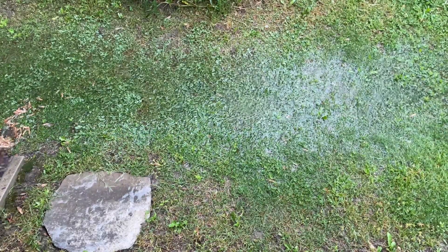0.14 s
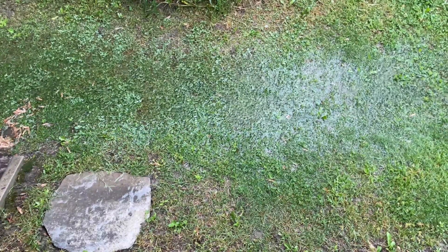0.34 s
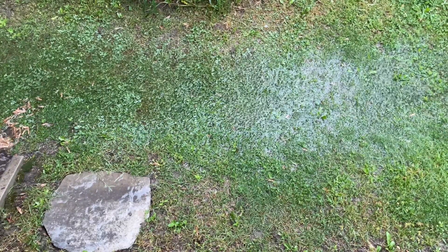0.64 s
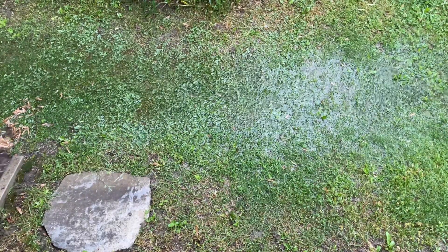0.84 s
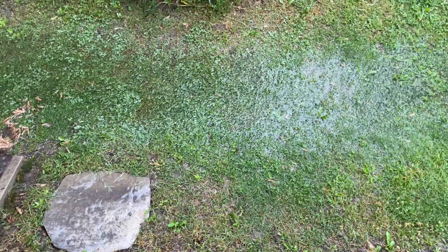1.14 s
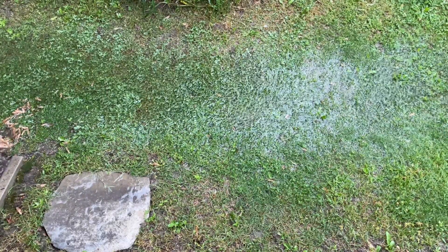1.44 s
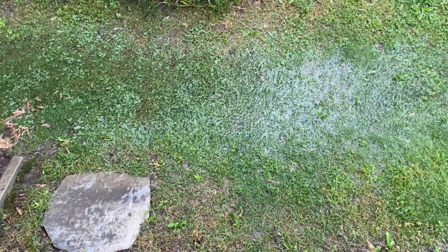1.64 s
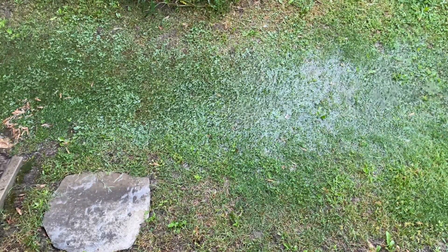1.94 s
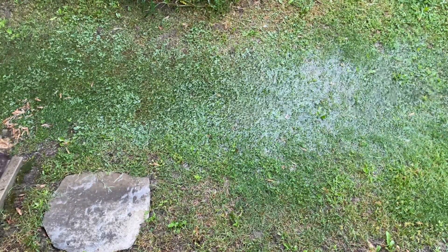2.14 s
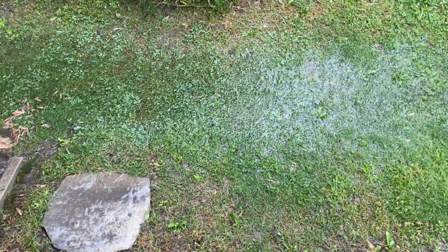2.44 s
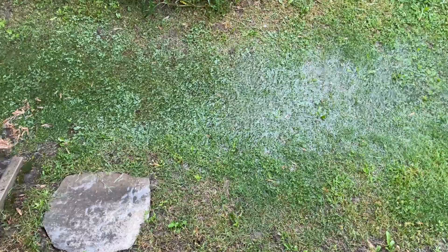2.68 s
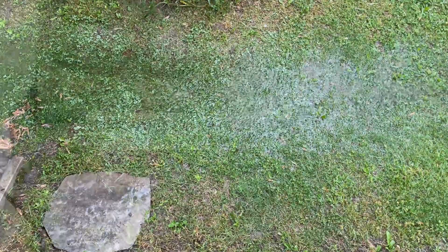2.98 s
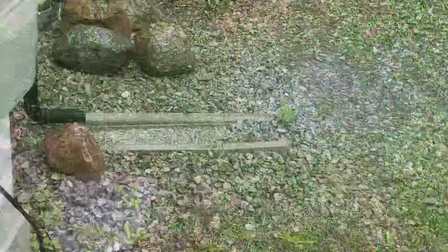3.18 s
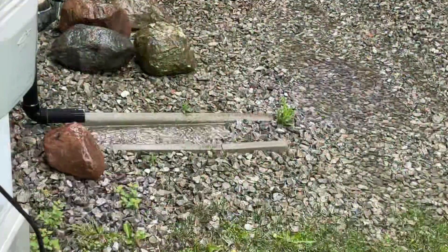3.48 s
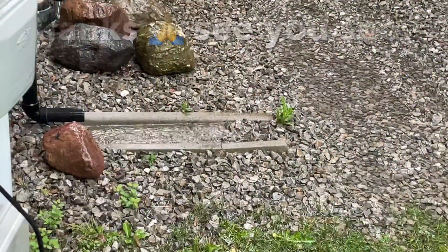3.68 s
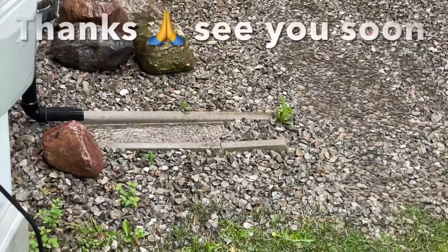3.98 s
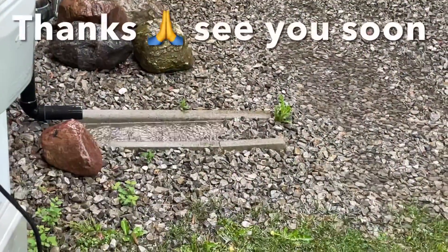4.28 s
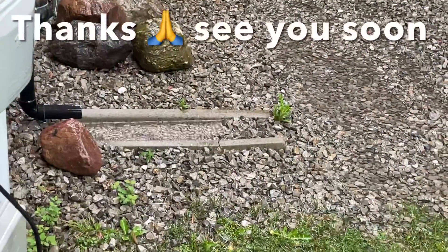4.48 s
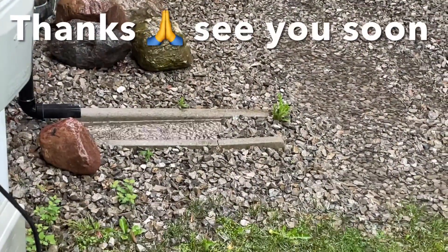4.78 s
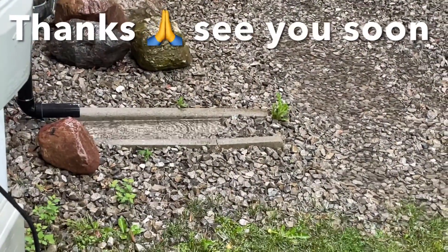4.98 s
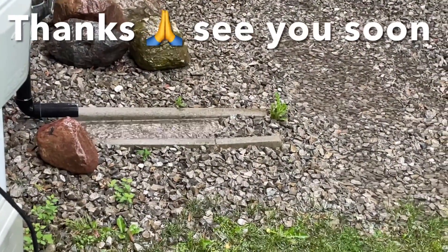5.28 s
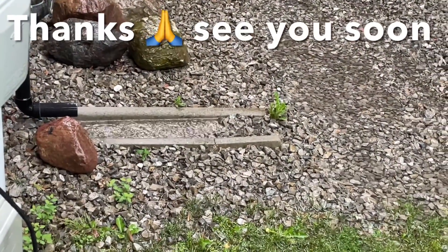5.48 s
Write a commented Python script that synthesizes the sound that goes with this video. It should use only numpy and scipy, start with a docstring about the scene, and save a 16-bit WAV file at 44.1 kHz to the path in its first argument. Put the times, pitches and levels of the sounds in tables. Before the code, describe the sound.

Rain hisses on grass, then crackles on stones with burbling runoff, as a small bird chirps repeatedly and a single loud pop strikes late.

```python
"""Rain from lawn to gravel, with a sparrow

Rain, as noise shaped by random splashes, falls on a lawn, then more crisply on gravel by a house.
A two-voiced sparrow chirps about once a second, with reflections; light air rumbles on the microphone
and far tyres hiss. Near drops tick and ring, a downspout burbles, and a broad band of noise
swells and fades like a car on a wet road. One fat drop knocks on the microphone as a falling pop."""
import sys
import numpy as np
from scipy import signal
from scipy.fft import rfft, irfft
from scipy.io import wavfile
from scipy.ndimage import uniform_filter1d

SR = 44100
rng = np.random.default_rng(int(sys.argv[2]) if len(sys.argv) > 2 else 0)


def master_out(mix):
    """Clip the mix to full scale and print it as 16-bit PCM to the path in sys.argv[1]."""
    frames = np.transpose(np.atleast_2d(mix))
    ceiling = np.clip(frames, -1, 1)
    pcm = np.round(ceiling * 32767).astype(np.int16)
    wavfile.write(sys.argv[1], SR, pcm)


N = 247878
T = np.arange(N) / SR
PORT_LAG_S = 0.000186  # sound from the left reaches the right port this much later


def undb(db):
    """Logarithmic level: decibels to amplitude gain."""
    return 10 ** (np.asarray(db) / 20)


def unit(x):
    """Normalization: scale to rms 1."""
    return x / np.sqrt(np.mean(x ** 2) + 1e-20)


def colour(x, points):
    """Spectral shaping: weight each frequency by (Hz, dB) points joined on a logarithmic axis."""
    hz, db = np.transpose(points)
    log_f = np.log(np.arange(N // 2 + 1) * SR / N + 1)
    gain = undb(np.interp(log_f, np.log(hz), db, left=-90, right=-90))
    return irfft(rfft(x) * gain, N)


def band(x, lo_hz, hi_hz):
    """Band-pass filtering with gentle slopes."""
    edges_hz = [lo_hz, min(hi_hz, SR / 2 - 100)]
    return signal.sosfilt(signal.butter(2, edges_hz, "band", fs=SR, output="sos"), x)


def walk(rate):
    """Random modulation: held random values, about `rate` a second, smoothed to a wander of rms 1."""
    hold = max(int(SR / rate), 1)
    steps = rng.standard_normal(N)[np.arange(N) // hold]
    return unit(uniform_filter1d(steps, hold))


def bell(t, centre, half, order=2):
    """Smooth envelope: a hump of height 1; a higher order flattens its top."""
    return np.exp(-np.abs((t - centre) / half) ** order)


def step(t, width):
    """Smooth switching: a rise from 0 to 1 around t = 0."""
    return (1 + np.tanh(t / width / 2)) / 2


def stereo(mid, side):
    """Sum and difference: left and right from their common and differing parts."""
    return np.array([mid + side, mid - side])


def patter(rate, spread_db, share, flicker_db):
    """Shot noise: far drops merge into hiss; nearer ones tick, with each octave flickering on its own."""
    chance, size = rng.random((N, 2)).T
    hits = (chance < rate / SR) * undb(spread_db * np.minimum(-np.log(size + 1e-9), 4))
    hits = signal.lfilter([1], [1, -np.exp(-1 / (0.0084 * SR))], hits)  # a splash lasts a few milliseconds
    share = np.clip(share, 0, 1)
    f = np.arange(N // 2 + 1) * SR / N
    edges_hz = [0, 700, 1400, 2800, 5600, 11200, SR]
    total = 0
    for lo, hi in zip(edges_hz, edges_hz[1:]):
        noise = rng.standard_normal((2, N))
        power = 1 - share + share * unit(hits * undb(4.1 * walk(400))) ** 2
        octave = irfft(rfft(noise * np.sqrt(power)) * ((f >= lo) & (f < hi)), N)
        total = total + octave * undb(flicker_db * walk(22.13))
    return total


def rain(drops, mid_colour, side_colour, side_db):
    """Spectral shaping: the drops are shaped by one spectrum for the middle and one for the sides."""
    mid = unit(colour(drops[0], mid_colour))
    side = undb(side_db) * unit(colour(drops[1], side_colour))
    return stereo(mid, side)


# The low patter on the lawn lies to the right, its hiss to the left.
# Each row: frequency in Hz, lean as a plain number from -1 (right) to 1 (left).
LAWN_LEAN = [(1200, -0.55), (2000, -.15), (4500, -.15), (6000, .65)]


def slant(drops):
    """Interaural delay: rain that falls more to one side reaches the nearer port first."""
    f = np.arange(N // 2 + 1) * SR / N
    lean = np.clip(np.interp(f, *np.transpose(LAWN_LEAN)), -1, 1) * np.sin(2 * np.pi * f * PORT_LAG_S)
    tied = 1j * lean * rfft(drops[0])  # locked in phase to the common part
    free = np.sqrt(1 - lean ** 2) * rfft(drops[1])
    return np.array([drops[0], irfft(tied + free, N)])


# Spectra of rain on the lawn: the part common to both ears, then the part that differs.
# Each row: frequency in Hz, relative level in dB per Hz.
LAWN_COMMON = [(100, -27), (250, -1), (380, -10), (520, -6), (720, -10.5), (900, -8), (1400, -12),
               (2700, -9), (4300, -13), (5600, -13), (6900, -22), (7800, -55.5), (9000, -19), (12500, -24),
               (14500, -56)]
LAWN_DIFFERING = [(88, -35), (150, -42), (230, -17), (542, -2), (598, 0.5), (1580, -8.5), (3010, -1.5),
                  (5290, -12.5), (6690, -8.5), (9130, -12.5), (10300, -22), (10900, -59), (11500, -41),
                  (12200, -21.5), (15800, -14)]
LAWN_DB, LAWN_EASE_DB_PER_S = -42.5, 0.62


def lawn_rain(on_gravel):
    """Dense shot noise: soft patter that eases slowly and yields to the gravel at constant power."""
    drops = slant(patter(rate=710, spread_db=7.5, share=0.14, flicker_db=1.5))
    lawn = rain(drops, LAWN_COMMON, LAWN_DIFFERING, side_db=-1.0)
    return lawn * undb(LAWN_DB - LAWN_EASE_DB_PER_S * T) * np.sqrt(1 - on_gravel)


# Spectrum of the air. Each row: frequency in Hz, relative level in dB per Hz.
AIR_SPECTRUM = [(20, -38), (40, -2.5), (65, 3), (100, 0), (150, -5.5), (250, -16), (500, -21.5)]
# Lulls of the air. Each row: centre in seconds, half length in seconds, change in dB.
AIR_LULLS = [(0.362, 0.034, -10), (4.487, 0.067, -19), (5.093, 0.35, -7.5)]
# Soft low thuds of air on the microphone.
# Each row: start in seconds, level in dB, mean pitch in Hz (it wavers), time to the peak in seconds.
AIR_BUMPS = [(.428, -30, 58.6, 0.017), (0.719, -32.5, 103, 0.0087), (.841, -27.5, 87, 0.0063),
             (.872, -35.5, 99, 0.016), (1.13, -41, 56.5, 0.02), (1.465, -31.5, 73, 0.019),
             (1.494, -38, 80, 0.011), (1.687, -32, 74, 0.0052), (2.81, -34, 85, 0.0043),
             (3.279, -29, 68, 0.0091), (4.384, -28, 59.6, 0.0069), (4.667, -36.5, 86, 0.0072),
             (4.74, -40, 58.4, .02), (5.385, -38.5, 52.3, 0.016), (5.465, -37, 63, 0.011),
             (5.547, -33, 69, 0.0059)]
AIR_DB, AIR_EASE_DB_PER_S, AIR_WANDER_DB = -44.5, 0.8, -0.6


def air():
    """Turbulent pressure: low rumble, nearly alike in both ears, with lulls and short bumps."""
    noise = unit(colour(rng.standard_normal((2, N)), AIR_SPECTRUM))
    level_db = AIR_DB - AIR_EASE_DB_PER_S * T + AIR_WANDER_DB * walk(6.5)
    level_db = level_db + sum(db * bell(T, s, half) for s, half, db in AIR_LULLS)
    out = stereo(noise[0] * undb(level_db), noise[1] * undb(-55.5))
    for s, db, hz, rise_s in AIR_BUMPS:
        age = np.maximum(T - s, 0) / rise_s
        wavering_hz = hz * np.exp(0.19 * walk(120)) * (T > s)
        eddy = np.sin(2 * np.pi * np.cumsum(wavering_hz) / SR)
        out = out + undb(db) * eddy * age * np.exp(1 - age)
    return out


def traffic():
    """Filtered noise: far tyres give a narrow, wavering hiss over a low rumble, both fading."""
    hiss = unit(band(rng.standard_normal((2, N)), 836, 1130))
    rumble = undb(-7) * unit(band(rng.standard_normal(N), 160, 288))
    fade_db_per_s = 7
    return (hiss + rumble) * undb(-50 - fade_db_per_s * T + 0.33 * walk(7.6))


# One gesture of the lower voice, shared by all chirps: thin lead-in, held note, drop and sag, two arches.
# Each row: time in seconds from the start of the held note, pitch in Hz, level in dB,
# all before each call's own factors.
LOWER_GESTURE = [(-.05, 3150, -29), (-.01, 3520, -21), (-.003, 3900, -7), (.001, 5080, -2),
                 (.007, 5160, -9), (.015, 5165, 0), (.026, 5150, 0), (.029, 4100, -4), (.042, 3980, -7),
                 (.056, 3700, -13), (.073, 3580, -5), (.082, 4700, -4), (.092, 3700, -8), (.112, 2950, -21),
                 (.132, 3400, -20), (.138, 3850, -6), (.146, 4350, -10), (.158, 3050, -15),
                 (.169, 3100, -22)]
EDGE_S = 0.0011


def lower_voice(t):
    """Frequency modulation: pitch and gain climb, hold one note, drop, then make two quick arches."""
    s, hz, db = np.transpose(LOWER_GESTURE)
    gain = undb(np.interp(t, s, db)) * step(t - s[0], EDGE_S) * step(s[-1] - t, EDGE_S)
    return np.interp(t, s, hz), gain


# Pulses of the upper voice. Each row: centre in seconds from the start of the held note,
# half length in seconds, level in dB, all before each call's own factors.
UPPER_GESTURE = [(-.024, 0.019, -14.5), (.013, 0.012, -10.5), (0.056, 0.016, -11), (0.06, .005, -19),
                 (0.096, 0.0087, -20), (0.125, 0.023, -14.5)]
# pitch at the start of the held note, slope, highest and lowest pitch, before each call's pitch factor
UPPER_HZ, UPPER_SAG_HZ_PER_S, UPPER_TOP_HZ, UPPER_END_HZ = 5925, 14000, 6450, 4300


def upper_voice(t):
    """Second source: the other side of the syrinx glides straight down, sung in separate pulses."""
    gain = sum(undb(db) * bell(t, s, half) for s, half, db in UPPER_GESTURE)
    return np.clip(UPPER_HZ - UPPER_SAG_HZ_PER_S * t, UPPER_END_HZ, UPPER_TOP_HZ), gain


HELD_S, SETTLE_S = 0.0266, 0.0091  # after the held note each call settles on its own pitch


def whistle(voice, t, pitch, rough, trill, trill_hz, flutter_db):
    """Phase accumulation: a near sine follows a pitch contour with a fast trill and uneven pitch and level."""
    hz, gain = voice(t)
    waver, flutter, drift = (walk(rate)[:len(t)] for rate in (1400, 350, 60))
    # the held note is nearly pure; after it the buzz is full
    held = bell(t, .016, 0.013, order=4)
    after = np.clip((t - HELD_S) / SETTLE_S, 0, 1)
    buzz = (rough * waver + trill * np.sin(2 * np.pi * trill_hz * t + drift)) * (1 + after) / 2
    hz = hz * pitch ** after * (1 + buzz * (1 - 1.2 * held))
    return np.sin(2 * np.pi * np.cumsum(hz) / SR) * gain * undb(flutter_db * flutter * (0.5 - held / 2))


# The chirps. Each row: start of the held note in seconds, level in dB, pitch factor after the held note,
# length factor, accent of the held note in dB, upper voice in dB, sideways share in dB,
# lead-in change in dB, last arch change in dB.
CALLS = [ (-.033, -23, 1.013, 0.97, 7, -2.5, 4.5, 0, 0), (.634, -25, 1.007, 0.94, -1, -1.5, 7, 0, -3.5),
         (1.316, -24, 1.02, 0.93, -9, -2, 6.5, 0.5, -1), (2.448, -23.5, 1.02, 1, 2, -5, 3.5, -2, 2.5),
         (3.445, -19, .93, .91, -7.5, 0, -57, -6, -1), (4.442, -26, .96, .92, -18, 0, -28, -6, 0.5)]
# faint echo of the third chirp's held note
LATE_ECHO_S, LATE_ECHO_HALF_S, LATE_ECHO_HZ, LATE_ECHO_DB = 1.473, 0.013, 5360, -37.5
ECHO_S, ECHO_DB = .143, -26  # the chirps come back faintly from a far wall


def sparrow():
    """Two-source phonation: lead-in, held note and two lower arches; returns the sound and its sideways share."""
    out = np.zeros((2, N))
    for s, db, pitch, length, accent_db, upper_db, width_db, lead_db, end_db in CALLS:
        near = abs(T - s) < 1 / 4
        t = (T[near] - s) / length
        lower = whistle(lower_voice, t, pitch, rough=.015, trill=.03, trill_hz=280, flutter_db=3.5)
        upper = whistle(upper_voice, t, pitch, rough=.035, trill=.07, trill_hz=260, flutter_db=3.5)
        effort_db = accent_db * bell(t, 0.02, 0.017)
        effort_db = effort_db + lead_db * step(-t - .007, 0.0029) + end_db * step(t - .11, 0.011)
        out[:, near] += undb([[0], [width_db]]) * undb(db + effort_db) * (lower + undb(upper_db) * upper)
    late_echo = np.sin(2 * np.pi * np.cumsum(LATE_ECHO_HZ * (1 + 0.051 * walk(1400))) / SR)
    out[0] += undb(LATE_ECHO_DB) * late_echo * bell(T, LATE_ECHO_S, LATE_ECHO_HALF_S)
    echo = np.array([np.interp(T - ECHO_S, T, part, left=0) for part in out])
    return out + undb(ECHO_DB) * echo


# Nearby walls repeat each twist of the chirp. Each row: delay in seconds, level in dB.
WALL_REFLECTIONS = [(.0066, -14), (.0175, -10), (.031, -16)]
FAR_DB, FAR_T60_S = -20, .7  # slow scatter from the far side, relative to the near scatter at its start


def yard(x, sideways, t60, wet_db, side_db, wall_s, wall_db):
    """Convolution reverberation: direct sound, distinct reflections, and scatter from walls and shrubs."""
    t = T[:SR // 2]
    sideways = (sideways - np.interp(T - PORT_LAG_S, T, sideways)) / 2  # what differs between the two ports
    decay = undb(-60 * t / t60) + undb(FAR_DB - 60 * t / FAR_T60_S)
    tail = rng.standard_normal((2, len(t))) * decay * (t > .002)
    tail *= undb([[wet_db], [side_db]]) / np.sqrt(np.sum(tail ** 2, axis=1, keepdims=True))
    for s, db in WALL_REFLECTIONS:
        tail[:, int(s * SR)] += undb(db)
    wet = signal.fftconvolve(np.array([x, sideways]), tail, axes=1)[:, :N]
    wall = np.append(np.zeros(int(wall_s * SR)), sideways)[:N]
    return stereo(x + wet[0], undb(wall_db) * wall + wet[1])


# Near drops. Each row: start in seconds, level in dB before the attack, ring in Hz,
# top of the spray in Hz, decay of the spray in seconds.
NEAR_DROPS = [(1.8855, -31.5, 2490, 5750, 0.0088), (3.049, -35, 5200, 5500, .002),
              (3.116, -37, 2540, 3970, .002), (3.1837, -29.5, 2180, 6000, 0.0048),
              (3.5966, -29, 3800, 7950, 0.0043), (3.781, -31.5, 2980, 9000, 0.0025),
              (3.888, -41, 4300, 12000, .003), (3.958, -30, 2130, 12000, 0.0053),
              (4.0737, -24.5, 2320, 5000, .003), (4.353, -23, 2180, 6150, 0.0066),
              (4.5617, -50, 3570, 7200, 0.0027), (4.72, -30, 2900, 7900, 0.0026),
              (4.817, -27, 3580, 5460, 0.0027), (4.949, -25.5, 3670, 5500, 0.0045),
              (4.976, -51, 6500, 14000, 0.0031), (5.052, -37, 3930, 6000, 0.0027),
              (5.1305, -33, 4770, 6500, .005), (5.252, -31, 3400, 6000, .003),
              (5.341, -27.5, 4520, 6000, .004), (5.414, -31, 4100, 7000, .003),
              (5.39, -41, 2520, 14000, 0.002), (5.463, -52, 5240, 14000, 0.0026),
              (5.503, -35, 6030, 14000, 0.0024), (5.517, -34, 2390, 13000, 0.0015)]
DROP_ATTACK_S = .0006


def near_drops(ring_db, ring_s):
    """Impact and resonance: each near drop is a tick of spray and a brief wet ring."""
    out = np.zeros((2, N))
    t = T[:SR // 30]
    for s, db, hz, top_hz, decay_s in NEAR_DROPS:
        spray = band(band(rng.standard_normal((2, len(t))), 1500, top_hz), 1500, top_hz)
        ring = undb(ring_db) * np.sin(2 * np.pi * hz * t) * np.exp(-t / ring_s)
        drop = stereo(spray[0], spray[1] / 2) * np.exp(-t / decay_s) + ring
        drop = drop * (1 - np.exp(-t / DROP_ATTACK_S))
        i = int(s * SR)
        out[:, i:i + len(t)] += undb(db) * drop[:, :N - i]
    return out


# Spectrum of the rush. Each row: frequency in Hz, relative level in dB per Hz.
RUSH_SPECTRUM = [(100, -25), (250, -12.5), (500, -0.5), (900, 1), (1600, -0.5), (2500, -5.5), (4000, -16),
                 (6000, -99)]
RUSH_PEAK_S, RUSH_DB, RUSH_ATTACK_S, RUSH_RELEASE_S = 4.225, -33.5, 1, 1.67
RUSH_ECHO_S, RUSH_ECHO_DB = 0.003165, -24


def rush():
    """Comb filtering: a reflection makes a wide, soft roar slightly hollow as it swells and dies away."""
    noise = colour(rng.standard_normal((2, N)), RUSH_SPECTRUM)
    noise = unit(noise + undb(RUSH_ECHO_DB) * np.roll(noise, int(RUSH_ECHO_S * SR), axis=1))
    t = T - RUSH_PEAK_S
    swell = np.clip(1 + t / RUSH_ATTACK_S, 0, 1) ** 2 * np.clip(1 - t / RUSH_RELEASE_S, 0, 1)
    return stereo(noise[0], undb(-.5) * noise[1]) * undb(RUSH_DB) * swell


def plinks(count, lo_hz, hi_hz, cycles, glide, spread_db):
    """Bubble resonance: small bubbles at random moments ring for some cycles and rise in pitch; rms 1."""
    out = np.zeros(N)
    for when, pitch, size in rng.random((count, 3)):
        hz = lo_hz * (hi_hz / lo_hz) ** pitch
        i = int(when * N)
        age = np.arange(min(int(4 * cycles * SR / hz), N - i)) * hz / SR / cycles  # in decay times
        ring = np.sin(2 * np.pi * cycles * age * (1 + glide * age)) * np.exp(-age)
        out[i:i + len(age)] += ring * undb(spread_db * min(-np.log(size + 1e-9), 3))
    return unit(out)


# Spectra of rain on gravel: the part common to both ears, then the part that differs.
# Each row: frequency in Hz, relative level in dB per Hz.
GRAVEL_COMMON = [(150, 2), (400, -0.5), (1500, 2.5), (4000, 3.5), (6300, 1.5), (7500, -4.5), (8200, -81),
                 (9000, -9), (10800, -5), (13000, -10), (14500, -22)]
GRAVEL_DIFFERING = [(150, -3), (600, 10), (2000, 9), (4800, -84), (7000, 15), (8300, 11), (9800, 9.5),
                    (11500, -12.5), (13500, 3), (15000, 10), (15900, -2)]
GRAVEL_DB = -41


def gravel_rain(on_gravel):
    """Shot noise with resonances: a crisp crackle with ringing plinks, brought in at constant power."""
    crackle = patter(rate=1100, spread_db=3.2, share=.45, flicker_db=1.2)
    gravel = rain(crackle, GRAVEL_COMMON, GRAVEL_DIFFERING, side_db=-7.0)
    ringing = plinks(count=1200, lo_hz=2000, hi_hz=6200, cycles=11, glide=.006, spread_db=4.5)
    return (gravel + undb(-10.5) * ringing) * undb(GRAVEL_DB) * np.sqrt(on_gravel)


# Gushes from the downspout. Each row: start in seconds, level in dB.
SPOUT_GUSHES = [(3.35, -43), (3.586, -75)]
RUNOFF_DB, RUNOFF_LASTS_S, GUSH_ATTACK_S, GUSH_DECAY_S = -52.5, 1.4, 0.015, 0.07


def runoff():
    """Bubble and pipe resonance: water burbles from the downspout onto its splash block, and dwindles."""
    start = SPOUT_GUSHES[0][0]
    flow = undb(RUNOFF_DB) * step(T - start, GUSH_ATTACK_S) * bell(T, start, RUNOFF_LASTS_S)
    for s, db in SPOUT_GUSHES:
        flow = flow + undb(db) * step(T - s, GUSH_ATTACK_S) * np.exp(-np.maximum(T - s, 0) / GUSH_DECAY_S)
    pipe = unit(band(rng.standard_normal(N), 240, 299))  # the hollow note of the spout
    bubbles = plinks(count=2600, lo_hz=380, hi_hz=855, cycles=2.5, glide=0.017, spread_db=-0.5)
    return (undb(-1.0) * bubbles + undb(-4) * pipe) * flow


GLUG_S, GLUG_HALF_S, GLUG_DB, GLUG_HZ, GLUG_END_HZ, GLUG_FALL_S = 3.593, 0.028, -37.5, 540, 142, 0.0011


def glug():
    """Falling resonance: a gulp of water at the spout drops in pitch."""
    t = T - GLUG_S
    hz = GLUG_END_HZ + (GLUG_HZ - GLUG_END_HZ) * step(-t, GLUG_FALL_S)
    return undb(GLUG_DB) * np.sin(2 * np.pi * np.cumsum(hz) / SR) * bell(t, 0, GLUG_HALF_S)


# Modes of the buzz that leads into the knock.
# Each row: frequency in Hz, level in dB, build-up in seconds.
BUZZ_MODES = [(1800, -1, 0.0014), (586, -11.5, 0.0069)]
BUZZ_CUT_S, KNOCK_S = 0.00023, 4.3776
# the pop starts POP_HZ above the thud's pitch
POP_HZ, POP_FALL_S, POP_ATTACK_S, POP_DECAY_S = 1546, 0.00247, 0.00027, 0.0029
THUD_HZ, THUD_DB, THUD_DECAY_S = 39.8, -34, 0.014


def knock():
    """Impulsive excitation: a drop hits the left port, a short buzz, then a pop that falls into a thud."""
    t = T - KNOCK_S
    since = np.maximum(t, 0)
    hz = THUD_HZ + POP_HZ / (1 + since / POP_FALL_S) ** 2
    fade = np.exp(-since / POP_DECAY_S) + undb(THUD_DB) * np.exp(-since / THUD_DECAY_S)
    pop = -np.sin(2 * np.pi * np.cumsum(hz * (t > 0)) / SR) * (1 - np.exp(-since / POP_ATTACK_S)) * fade
    # the buzz builds up and is cut short just before the pop
    age = t + 0.00091
    buzz = 0
    for ring_hz, db, build_s in BUZZ_MODES:
        envelope = np.exp(-abs(age) / np.where(age < 0, build_s, BUZZ_CUT_S))
        buzz = buzz + np.cos(2 * np.pi * ring_hz * age) * undb(db) * envelope
    ports = np.array([pop + buzz, undb(-3.0) * pop + undb(-26) * buzz])
    return np.tanh(ports)  # the blow is hard enough to round its peaks


def treble_dip(x, depth, clear_s, from_hz):
    """High-frequency attenuation: the treble dips briefly after the knock."""
    treble = signal.sosfiltfilt(signal.butter(2, from_hz, "high", fs=SR, output="sos"), x)
    dip = np.clip(depth, 0, 1) * (T > KNOCK_S) * step(KNOCK_S + clear_s - T, 0.0067)
    return x - dip * treble


CROSSOVER_S, CROSSOVER_WIDTH_S = 3.27, 0.026  # the rain passes from lawn to gravel


def scene():
    """Superposition: rain, air, traffic, bird, drops, rush and runoff add up, then the knock."""
    on_gravel = step(T - CROSSOVER_S, CROSSOVER_WIDTH_S)
    bird = yard(*sparrow(), t60=.17, wet_db=-7, side_db=-5, wall_s=.0023, wall_db=0)
    outdoors = lawn_rain(on_gravel) + air() + traffic() + bird
    outdoors = outdoors + near_drops(ring_db=-1, ring_s=.004) + rush()
    outdoors = outdoors + gravel_rain(on_gravel) + runoff() + glug()
    return treble_dip(outdoors, depth=0.6, clear_s=0.16, from_hz=3450) + knock()


def record(dry):
    """Low-pass filtering: the recorder cuts the top, above 15800 Hz."""
    return signal.sosfilt(signal.ellip(8, .2, 70, 15800, fs=SR, output="sos"), dry)


dry = scene()
out = record(dry)
master_out(out)
```